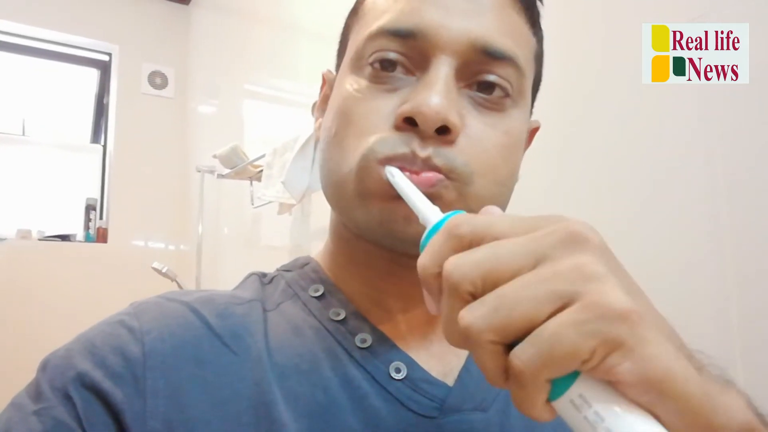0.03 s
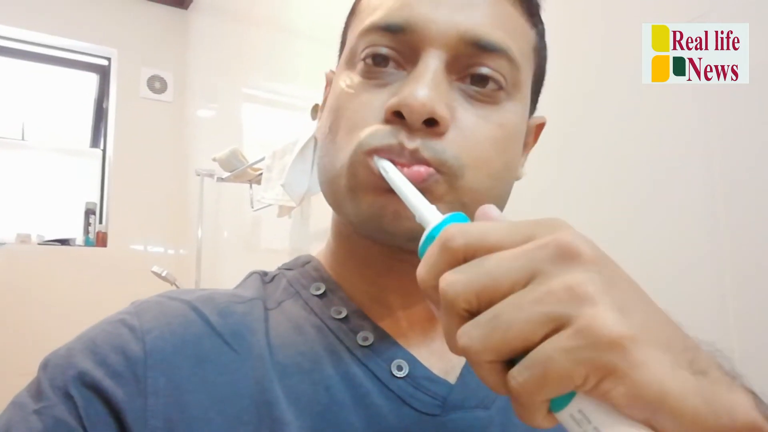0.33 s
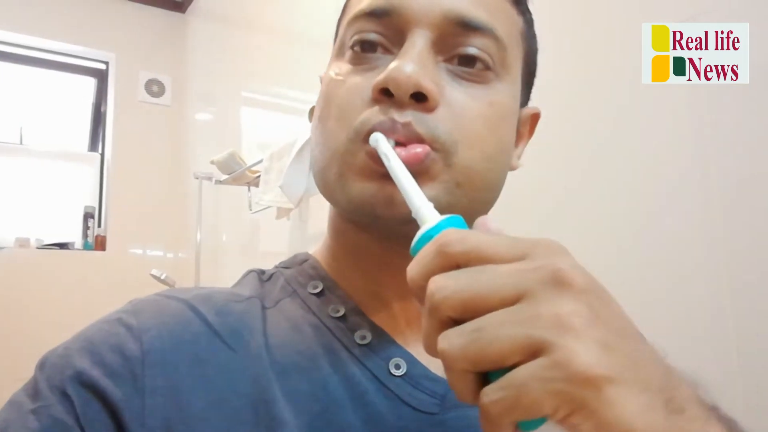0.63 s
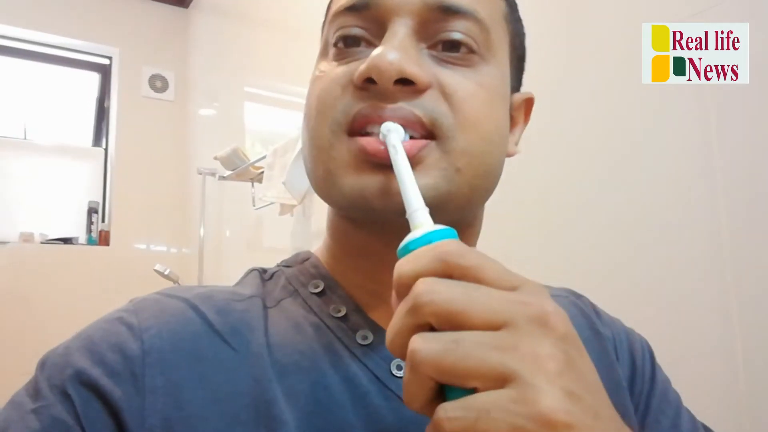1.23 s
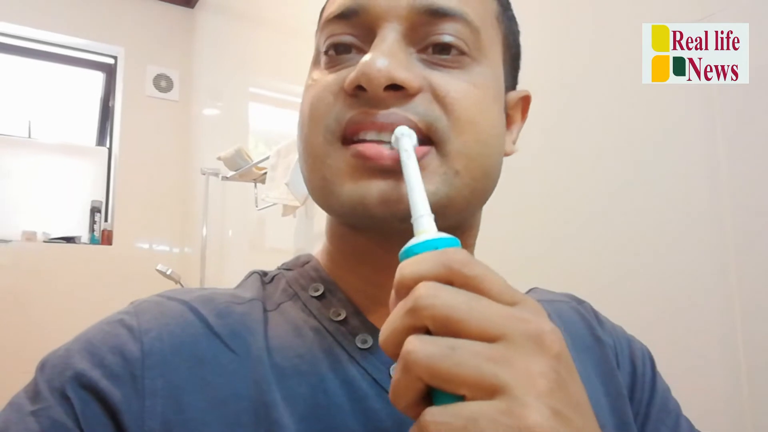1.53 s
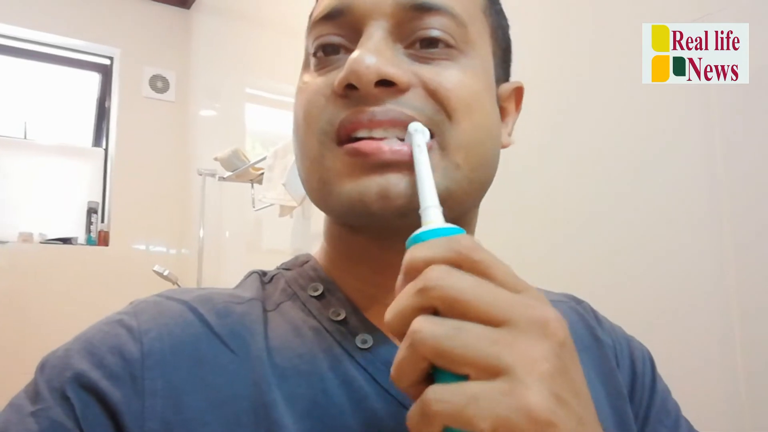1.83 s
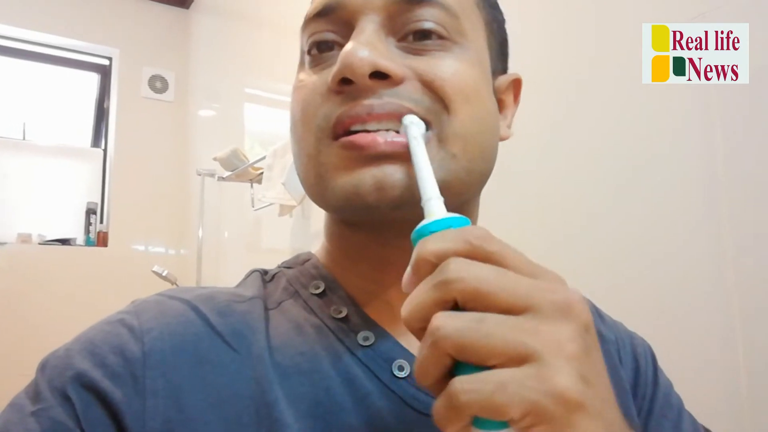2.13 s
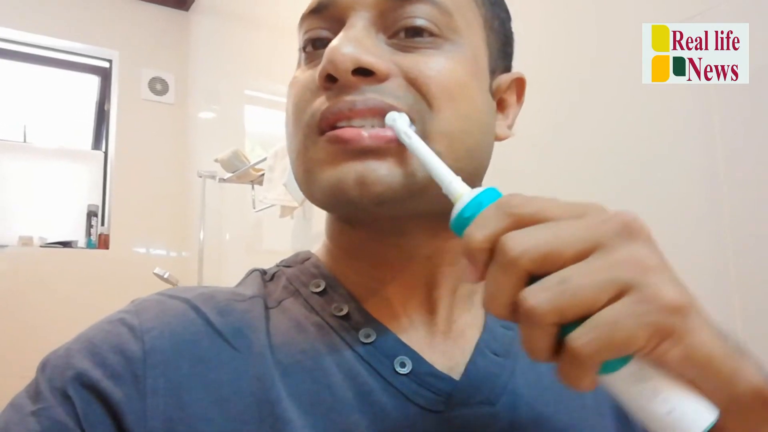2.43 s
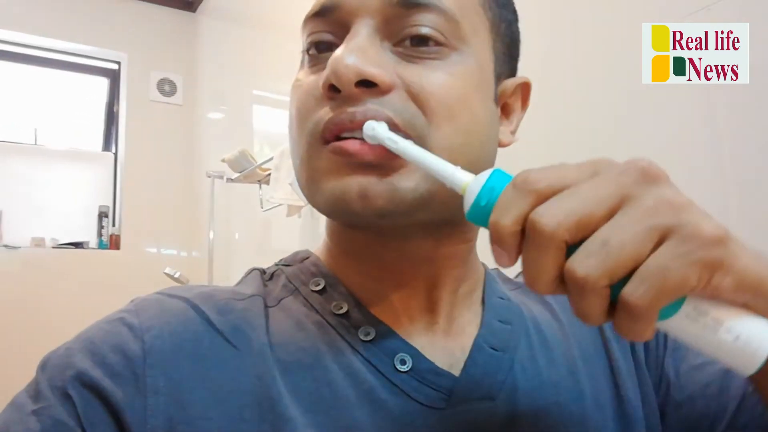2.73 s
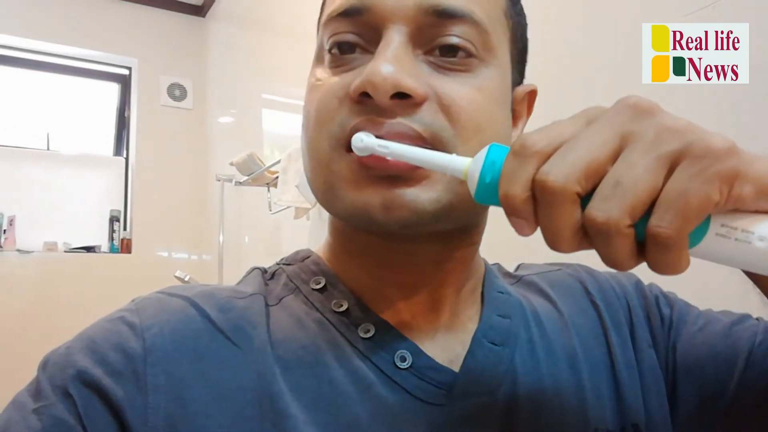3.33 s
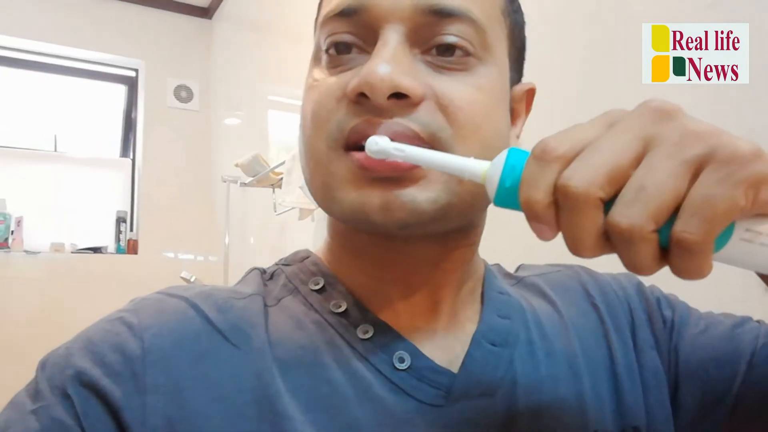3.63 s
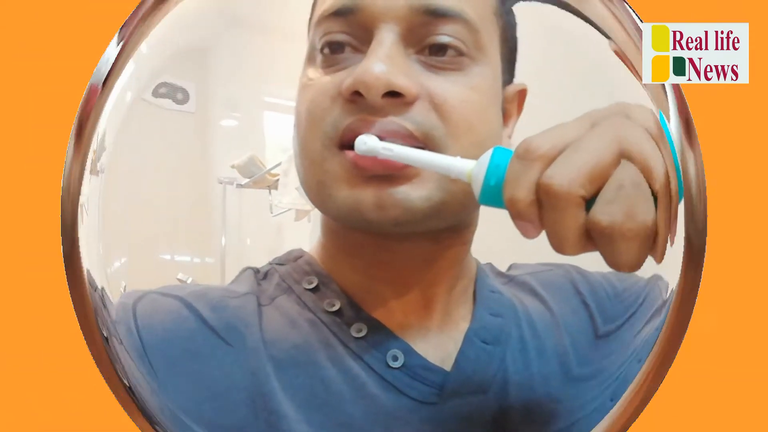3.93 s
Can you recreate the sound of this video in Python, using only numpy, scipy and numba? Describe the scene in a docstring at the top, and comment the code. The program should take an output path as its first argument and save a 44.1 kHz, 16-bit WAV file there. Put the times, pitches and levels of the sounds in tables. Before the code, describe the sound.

An electric toothbrush buzzes without a break against teeth, close and slightly left in a tiled bathroom. Its tone shifts as it moves, with a thin whine, wet crackles and small clicks. A fan hums faintly behind.

```python
"""An electric toothbrush buzzes against the teeth in a tiled bathroom, to the left of the listener.
Its linkage slaps through about seventy strokes a second, slowing under pressure; the slaps rattle the
housing and ring the brush and the mouth at pitches that shift as it moves. Gears whine, wet bristles
crackle, foam and saliva pop, and now and then the head knocks on a tooth. A fan hums behind."""
import sys
import numpy as np
from scipy import signal
from scipy.fft import rfft, irfft
from scipy.io import wavfile
from scipy.ndimage import uniform_filter1d
from numba import njit

SR = 44100
rng = np.random.default_rng(int(sys.argv[2]) if len(sys.argv) > 2 else 0)


def to_wav(s):
    """Save 16-bit WAV."""
    ch = np.atleast_2d(s).T  # columns
    pcm = np.round(np.clip(ch, -1, 1) * 32767)  # PCM
    wavfile.write(sys.argv[1], SR, pcm.astype(np.int16))


N = 176400
TIME = np.arange(N) / SR

# The fan's hum. Each row: pitch in Hz, level in dB.
FAN_HUM = [(58.5, -64), (112.6, -55.5), (183.5, -58.5)]
# Tone of the fan's rumble. Each row: frequency in Hz, relative gain in dB.
FAN_RUMBLE_EQ = [(10, -30), (25, -16), (40, -5), (60, -1.5), (88, -4), (130, 0), (155, -1), (195, 1),
                 (240, -4), (300, -14), (600, -23), (1500, -35)]
# The brush's lean to the left. Each row: frequency in Hz, tilt in dB, of which each side takes a share.
LEFT_TILT = [(300, 3.5), (900, 2.5), (1450, 5.5), (2100, 11.5), (2500, 7.5), (3500, 6.5), (6100, 10.5),
             (7000, 15.5), (7800, 17.5), (8600, 6.5), (10500, 6.5), (15000, 11)]

# Fader for the crackling foam. Each row: time in seconds, relative level in dB.
FOAM_LEVEL = [(0, -61), (.8, -49), (1.1, -51), (1.4, -49), (1.65, -46), (1.9, -64), (2.1, -65),
              (2.45, -60.5), (2.6, -46), (2.8, -59), (3.05, -48), (3.4, -49), (3.6, -52), (4, -48)]
# Saliva bubbles snapping. Each row: start in seconds, relative peak in dB.
SALIVA_TICKS = [(.083, -29), (.730, -22), (1.643, -29), (1.719, -27), (1.896, -22), (2.542, -29),
                (2.682, -26), (2.941, -27), (3.200, -29), (3.417, -27), (3.474, -27), (3.956, -26)]
# The head hitting a tooth. Each row: start in seconds, relative peak in dB, ring pitch in Hz.
TOOTH_KNOCKS = [(.524, -23, 7700), (.544, -20, 7900), (.948, -20, 7900), (1.084, -22, 8900),
                (1.325, -28, 7550), (1.385, -24.5, 7900), (1.9, -25, 9100), (2.633, -20, 6240),
                (2.744, -25, 8150), (2.839, -17, 8500), (3.281, -21, 8000), (3.418, -18.5, 8200),
                (3.848, -19.5, 7550)]
# Fader for the bristle crackle. Each row: time in seconds, relative level in dB.
BRISTLE_LEVEL = [(0, -38), (.35, -31), (.55, -36), (.63, -38), (.88, -33.5), (.97, -34), (1.22, -34),
                 (1.4, -30.5), (1.8, -30.5), (2.1, -31.5), (2.55, -31.5), (2.85, -31), (3.2, -30),
                 (3.45, -32), (3.72, -33), (4, -29)]

# Pure tones of the gears. Each row: multiple of the stroke rate, relative level in dB.
GEAR_PARTIALS = [(15, -22), (30, -16), (53, 0), (78, -10), (106, -4)]
# Faders for the gears. Each row: time in seconds, relative level in dB.
GEAR_LEVEL = [(0, -46), (.35, -46), (.6, -54), (1.1, -53), (1.6, -50), (2.0, -48), (2.3, -55), (2.85, -51),
              (3, -46), (3.24, -47), (3.32, -42), (3.55, -42.5), (3.64, -49), (4, -50)]  # the pure tones
MESH_LEVEL = [(0, -47), (.62, -49), (.7, -41), (1.03, -40.5), (1.13, -38), (1.23, -43.5), (1.45, -43),
              (1.7, -40.5), (2.03, -41.5), (2.2, -54), (2.55, -52), (2.72, -46), (2.9, -49), (3.1, -44),
              (3.55, -46), (4, -46)]  # the rough whine of the meshing teeth
MESH_UPPER_LEVEL = [(0, -50), (.6, -46), (.9, -50), (1.25, -46), (1.85, -46.5), (2.05, -54), (3.2, -54),
                    (3.35, -45.5), (3.8, -45.5), (4, -50)]  # its overtone

# Gliding resonances. Each row: time in seconds, pitch in Hz, relative level in dB.
HEAD_RING = [(0, 7170, -29), (.33, 6880, -33.5), (.65, 7060, -37.5), (1, 6950, -39), (1.3, 7100, -38),
             (1.7, 7270, -38), (2, 7700, -34.5), (2.25, 7450, -33.5), (2.42, 7150, -31), (2.7, 7350, -50),
             (3.2, 8200, -50), (3.55, 7760, -34), (4, 6940, -46)]  # main ring of the brush head
HEAD_UPPER_RING = [(0, 8650, -30.5), (.35, 8630, -30.5), (.7, 8430, -33.5), (1, 8420, -32.5),
                   (1.3, 8760, -30.5), (1.7, 8570, -34), (2.15, 8930, -37.5), (2.45, 8700, -32.5),
                   (2.9, 8700, -33), (3.3, 8660, -36), (4, 8700, -33)]  # its upper ring
NECK_RING = [(0, 4900, -38), (.35, 5000, -37.5), (.7, 5020, -50), (1.45, 5080, -40), (1.8, 5200, -48),
             (2.4, 5220, -42), (3.15, 5030, -47.5), (4, 5400, -45)]  # the brush neck
SHAFT_RING = [(0, 3560, -39), (.12, 3610, -35.5), (.35, 3560, -41), (.6, 3560, -41.5), (.95, 3500, -50),
              (1.2, 3500, -44), (1.65, 3480, -41.5), (1.95, 3600, -45), (2.2, 3600, -58), (2.46, 3500, -41),
              (2.7, 3560, -50), (3.3, 3520, -45), (4, 3560, -47)]  # the drive shaft
MOUTH_RING = [(0, 1990, -41), (.3, 2000, -39.5), (.44, 2030, -44), (.5, 1910, -51), (.8, 1910, -44),
              (1.3, 2020, -54), (1.8, 1770, -53), (2.03, 1450, -42), (2.15, 1640, -36.5), (2.28, 1750, -65),
              (2.53, 1230, -42.5), (2.75, 1590, -77), (3.45, 1410, -47), (4, 1660, -54.5)]  # the mouth cavity
CHEEK_RING = [(0, 476, -56), (.45, 450, -53), (.9, 746, -57.5), (1.7, 935, -51), (2.3, 870, -57.5),
              (4, 846, -54.5)]  # low ring of the mouth, rising as the lips part

# Fader for the housing rattle. Each row: time in seconds, relative level in dB.
RATTLE_LEVEL = [(0, -38), (.33, -41), (.45, -41.5), (.65, -40.5), (1, -41), (1.4, -41.5), (1.9, -40),
                (2.15, -40.5), (2.38, -38.5), (2.55, -40), (2.8, -40.5), (3.3, -42.5), (3.7, -41.5),
                (4, -40.5)]
# Tone of that rattle. Each row: frequency in Hz, relative gain in dB.
RATTLE_EQ = [(60, -27), (250, -18), (500, -14.5), (800, -12.5), (1200, -10.5), (1600, -5.5), (2100, -4.5),
             (2550, -4.5), (3200, 1), (4600, 0.5), (6100, -2.5), (7000, -2.5), (8600, -12.5), (9400, -4),
             (10800, -11.5), (13000, -20.5), (15500, -25)]
# Slaps of the linkage. Each row: place in the stroke from 0 to 1, relative strength.
LINKAGE_SLAPS = [(0.098, 0.75), (0.432, 0.95), (0.622, 0.33)]
# Drive speed, sagging under pressure. Each row: time in seconds, strokes per second.
STROKE_RATE = [(0, 68.1), (.22, 68.6), (.33, 68.2), (.48, 67.1), (.55, 67.7), (.73, 67), (.83, 65.9),
               (.92, 65.6), (1.03, 66.1), (1.22, 68.2), (1.62, 67.5), (1.92, 70.9), (2.17, 72.6),
               (2.43, 69.8), (2.72, 72.1), (2.95, 71.2), (3.22, 70.8), (3.29, 70.3), (3.55, 70.35),
               (3.63, 68.9), (3.76, 69.3), (4, 68.7)]


def from_db(db):
    """Decibels to gain."""
    return 10 ** (np.asarray(db) / 20)


def unit_power(x):
    """Scale to an RMS of one."""
    return x / np.sqrt(np.mean(x ** 2) + 1e-20)


def automation(rows):
    """Straight ramps between timed rows: one curve for each column after the time."""
    times, *columns = np.transpose(rows)
    return [np.interp(TIME, times, column) for column in columns]


def equalise(x, points, share=1):
    """Filter by a smooth (Hz, dB) curve, its decibels scaled by share."""
    hz, db = np.transpose(points)
    size = N + 4096
    bins_hz = np.maximum(np.fft.rfftfreq(size, 1 / SR), 1)
    gain = from_db(share * np.interp(np.log(bins_hz), np.log(hz), db))
    return irfft(rfft(x, size) * gain)[..., :N]


def drift(per_s):
    """A random wander with a spread of about one."""
    knots = rng.standard_normal(N // 20)
    return np.interp(TIME * per_s + rng.random(), np.arange(len(knots)), knots) * np.sqrt(3 / 2)


@njit
def resonate(x, angle, radius):
    """Two-pole resonance whose centre can glide."""
    y = np.zeros(len(x))
    for i in range(2, len(x)):
        push = (1 - radius * radius) / 2 * (x[i] - x[i - 2])
        y[i] = push + 2 * radius * np.cos(angle[i]) * y[i - 1] - radius * radius * y[i - 2]
    return y


def ring(x, hz, width_hz):
    """A resonance with steep skirts, at unit power."""
    angle = 2 * np.pi * hz / SR * np.ones(N)
    radius = np.exp(-np.pi * np.pi / 2 * width_hz / SR)
    return unit_power(resonate(resonate(x, angle, radius), angle, radius))


def sustain(x, window_s=.07):
    """Hold the short-term power steady, as the motor keeps feeding the ring."""
    power = uniform_filter1d(x * x, size=int(window_s * SR))
    return x / np.sqrt(np.maximum(power, 1e-9))


def bursts(rows, decay_s, stage_width_hz):
    """Dying puffs of noise through two broad resonant stages, from rows of (s, peak dB, Hz)."""
    out = np.zeros(N)
    age = np.arange(SR // 20) / SR
    radius = np.exp(-np.pi * stage_width_hz / SR)
    for start_s, db, hz in rows:
        puff = rng.standard_normal(len(age)) * np.exp(-age / decay_s)
        angle = np.full(len(age), 2 * np.pi * hz / SR)
        hit = resonate(resonate(puff, angle, radius), angle, radius)
        start = int(start_s * SR)
        out[start:start + len(age)] += (from_db(db) * hit / np.abs(hit).max())[:N - start]
    return out


def crackle_sizes(spread_db=2.5):
    """Random gains for tiny snaps: mostly small, a few standing out."""
    return from_db(spread_db * np.minimum(rng.exponential(1, N), 3))


def chatter(strokes, force, loose, change_per_s=2.52):
    """Tiny contacts repeat each stroke and change as the head moves; loose is the friction's share."""
    patterns = signal.resample(rng.standard_normal((4, 512)), 4096, axis=1)
    weights = np.array([drift(change_per_s) for _ in patterns])
    looped = patterns[:, (strokes % 1 * patterns.shape[1]).astype(int)]
    contacts = unit_power(np.sum(weights * looped, axis=0) / np.linalg.norm(weights, axis=0))
    friction = rng.standard_normal(N)
    return unit_power(force * (np.sqrt(1 - loose) * contacts + np.sqrt(loose) * friction))


def fan(waver_db=2.5, rumble_db=-53):
    """The bed: a wavering hum over a low rumble, nearly alike on both sides."""
    hum = 0
    for hz, db in FAN_HUM:
        gain = from_db(db + waver_db * drift(4.2)) * np.sqrt(2)
        hum += gain * np.sin(2 * np.pi * hz * TIME + np.pi / 10 * drift(10))
    mid, side = from_db(rumble_db) * unit_power(equalise(rng.standard_normal((2, N)), FAN_RUMBLE_EQ))
    return hum + mid + from_db(-28) * side * np.array([[1], [-1]])


def tile_echoes(x, t60_s=.73, change_per_s=3.5):
    """Dense reflections; one pattern crossfades into the next as hand and head move."""
    age = np.arange(SR // 2) / SR
    running = np.pad(x, (len(age) - 1, 0), mode="reflect")  # the room already rings at the start
    place = TIME * change_per_s
    out = np.zeros(N)
    for k in range(int(place[-1]) + 2):
        near = np.flatnonzero(np.abs(place - k) < 1)
        tail = rng.standard_normal(len(age)) * from_db(-60 * age / t60_s) * (age > .002)
        tail /= np.linalg.norm(tail)
        echoes = signal.fftconvolve(running[near[0]:near[-1] + len(age)], tail, "valid")
        out[near] += np.cos(np.pi / 2 * (place[near] - k)) * echoes
    return out


def bathroom(x, right_lag_s=7 / SR):
    """Direct sound plus tile echoes: close and bright on the left, mostly room on the right."""
    left = from_db(-3.5) * tile_echoes(x) + from_db(-3) * x
    right = tile_echoes(x) + from_db(-22) * np.interp(TIME - right_lag_s, TIME, x)
    return np.array([equalise(left, LEFT_TILT, share=.4), equalise(right, LEFT_TILT, share=-.29)])


def foam(pops_per_s=450):
    """A fine fizz: tiny bubbles of paste burst between the bristles."""
    db, = automation(FOAM_LEVEL)
    pops = (rng.random(N) < pops_per_s / SR) * crackle_sizes()
    floor = 1e-12 * rng.standard_normal(N)
    return from_db(db) * ring(pops + floor, hz=11800, width_hz=5000)


def saliva(hz=11500):
    """Bright wet ticks: bubbles snap between lip and brush."""
    return bursts([(start_s, db, hz) for start_s, db in SALIVA_TICKS], decay_s=.002, stage_width_hz=6500)


def knocks():
    """Short hard rattles of the head on a tooth."""
    return from_db(8) * bursts(TOOTH_KNOCKS, decay_s=.004, stage_width_hz=2200)


def bristles(force, snaps_per_s=1600):
    """Wet bristles flick off the teeth in tiny snaps, hardest at each slap."""
    db, = automation(BRISTLE_LEVEL)
    snaps = (rng.random(N) < snaps_per_s / SR) * rng.choice([-1, 1], N) * crackle_sizes()
    return from_db(db) * ring(snaps * force, hz=7790, width_hz=1070)


def gear_tones(strokes, waver_db=2):
    """The gears sing in thin wavering tones locked to the drive speed."""
    db, = automation(GEAR_LEVEL)
    out = 0
    for multiple, partial_db in GEAR_PARTIALS:
        gain = from_db(db + partial_db + waver_db * drift(5.99)) * np.sqrt(2)
        out += gain * np.sin(2 * np.pi * multiple * strokes)
    return out


def gear_mesh(strokes, stroke_hz, force):
    """The gear teeth grind in two narrow bands that rise and fall with the drive speed."""
    out = 0
    for fader, multiple, width_hz in [(MESH_LEVEL, 52.2, 125), (MESH_UPPER_LEVEL, 77.4, 190)]:
        db, = automation(fader)
        grind = chatter(strokes, force, loose=.3)
        out += from_db(db) * sustain(ring(grind, multiple * stroke_hz, width_hz))
    return out


def brush_and_mouth(strokes, force):
    """The rattle rings the head, neck and shaft of the brush, and the mouth."""
    def resonance(curve, push, width_hz, loose):
        hz, db = automation(curve)
        return from_db(db) * sustain(ring(chatter(strokes, push, loose), hz, width_hz))

    hard_slaps = force ** 2.2  # the mouth answers mostly to the hardest hits
    return (resonance(HEAD_RING, force, width_hz=380, loose=.98)
            + resonance(HEAD_UPPER_RING, force, width_hz=480, loose=.98)
            + resonance(NECK_RING, force, width_hz=280, loose=.98)
            + resonance(SHAFT_RING, force, width_hz=330, loose=.7)
            + resonance(MOUTH_RING, hard_slaps, width_hz=220, loose=.42)
            + resonance(CHEEK_RING, hard_slaps, width_hz=320, loose=.8))


def housing_rattle(strokes, force):
    """The body of the buzz: the drive shakes a broad rattle out of the plastic housing."""
    db, = automation(RATTLE_LEVEL)
    rattle = equalise(chatter(strokes, force, loose=.96), RATTLE_EQ)
    return from_db(db + 8) * unit_power(rattle)


def linkage_force(strokes, decay_strokes=.058, steady_force=.5, max_scatter_db=4):
    """The pulse of the buzz: each slap of the linkage jumps up and dies away, never twice alike."""
    slaps = sum(strength * np.exp(-((strokes - place) % 1) / decay_strokes)
                for place, strength in LINKAGE_SLAPS)
    return (steady_force + slaps) * from_db(max_scatter_db * np.tanh(drift(200) / 2))


def scene():
    """One drive speed paces the rattle, rings and gears; the fan sits underneath."""
    stroke_hz, = automation(STROKE_RATE)
    stroke_hz *= 1 + .0015 * drift(40)  # slight flutter
    strokes = np.cumsum(stroke_hz) / SR
    force = linkage_force(strokes)
    buzz = housing_rattle(strokes, force) + brush_and_mouth(strokes, force)
    brush = buzz + bristles(force) + foam() + saliva() + knocks()
    whine = gear_tones(strokes) + gear_mesh(strokes, stroke_hz, force)
    # The handle faces the listener, so its whine is drier and more central.
    direct_whine = np.array([whine, from_db(-2) * whine])
    return bathroom(brush + from_db(-10) * whine) + direct_whine + fan()


def record(dry):
    """A steep low-pass takes off the very top."""
    cutoff_hz = 15500
    return signal.sosfilt(signal.ellip(12, .1, 90, cutoff_hz, fs=SR, output="sos"), dry)


dry = scene()
out = record(dry)
to_wav(out)
```